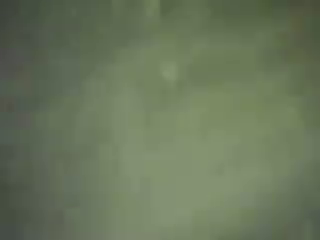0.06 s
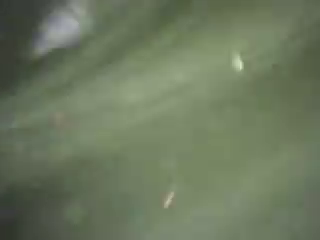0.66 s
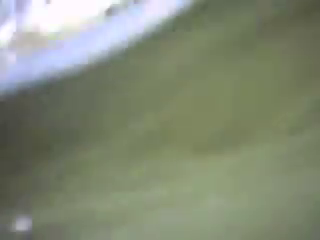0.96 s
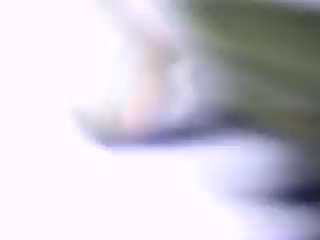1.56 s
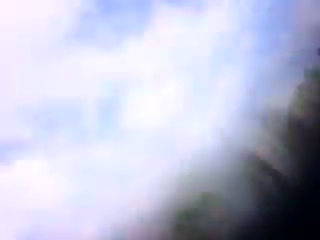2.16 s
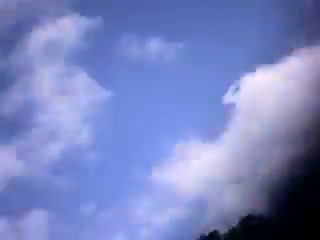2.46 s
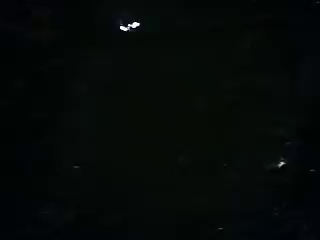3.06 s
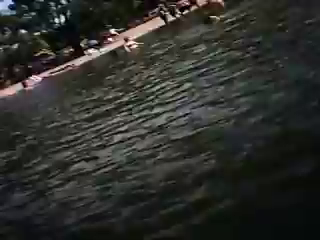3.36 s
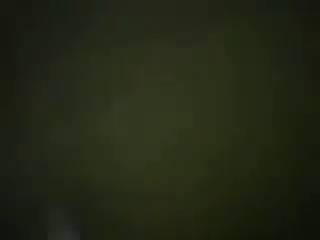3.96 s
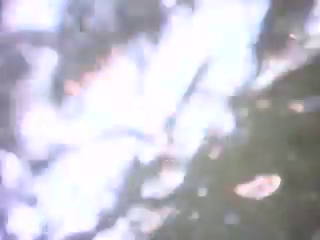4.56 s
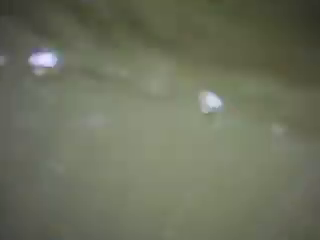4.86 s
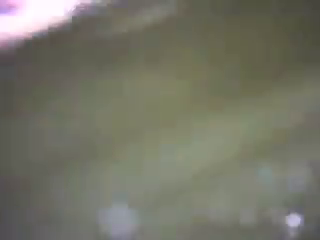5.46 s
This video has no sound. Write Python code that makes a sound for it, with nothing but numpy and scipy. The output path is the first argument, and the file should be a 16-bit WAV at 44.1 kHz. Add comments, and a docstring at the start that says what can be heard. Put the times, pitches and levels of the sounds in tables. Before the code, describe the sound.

Irregular muffled splashes and gurgles hit a small microphone at the water's surface, with knocks, booms and a crackling dunk.

```python
"""Water plops and sloshes around a small waterproof camera that is dipped, swung out and plunged back in.
Drops strike the housing and trap bubbles, which resonate like masses on springs of air; sloshes churn up
swarms of them. Air pockets throb, jolts set the mount booming and the wet housing rubs in its grip,
all over a faint hiss and a low sway. The plunge overloads the narrow-band microphone, which chokes for
moments and crackles."""
import sys
import numpy as np
from scipy import signal
from scipy.fft import rfft, irfft, next_fast_len
from scipy.io import wavfile

SR = 44100
rng = np.random.default_rng(int(sys.argv[2]) if len(sys.argv) > 2 else 0)


def dump_mix(stems):
    """Bounce the given channels to the path in sys.argv[1] as a 16-bit WAV at rate SR."""
    frames = np.atleast_2d(stems).T  # one column per channel
    limited = np.clip(frames, -1, 1)  # hard clip at full scale
    pcm = np.round(limited * 32767).astype(np.int16)
    wavfile.write(sys.argv[1], SR, pcm)


N = 251370


def amp(db):
    """Amplitude ratio of a level in decibels."""
    return 10 ** (np.asarray(db) / 20)


def unit(x):
    """Normalisation to rms 1."""
    return x / np.sqrt(np.mean(x ** 2) + 1e-20)


def clock(seconds):
    """Sample times over a duration."""
    return np.arange(int(seconds * SR)) / SR


def add(track, start, sound):
    """Superposition: a sound joins a track at a start time in seconds."""
    part = track[max(round(start * SR), 0):][:len(sound)]
    part += sound[:len(part)]


def filtered(x, response):
    """Linear filtering: the spectrum of x is multiplied by a frequency response."""
    size = next_fast_len(len(x) + 8192)
    return irfft(rfft(x, size) * response(np.fft.rfftfreq(size, 1 / SR)), size)[:len(x)]


def coloured(x, points):
    """Spectral shaping by (Hz, dB) points, at rms 1."""
    points_hz, db = np.transpose(points)
    return unit(filtered(x, lambda hz: amp(np.interp(np.log(hz + 1), np.log(points_hz), db))))


def ring(t, hz, t60, attack, rise=0):
    """Damped oscillation; rise is the fraction by which a bubble's pitch climbs as it nears the surface."""
    phase = 2 * np.pi * hz * t * (1 + rise * np.minimum(t / t60, 1) / 2)
    return np.sin(phase) * amp(-60 * t / t60) * (1 - np.exp(-t / attack))


def swarm(rate, low_hz, high_hz, cycles, spread_db):
    """Shot noise: ringing grains (bubbles, slips) of random size add up at random moments, at rms 1."""
    pitch, strength, polarity, onset = np.hsplit(rng.random((int(rate * N / SR), 4)), 4)
    hz = low_hz * (high_hz / low_hz) ** pitch
    size = amp(spread_db * np.minimum(-np.log(1 - strength), 3)) * np.sign(polarity - .5)
    t = clock(min(cycles / low_hz, 80 / rate))
    grains = size * ring(t, hz, t60=cycles / hz, attack=0.16 / hz, rise=0.27)
    samples = (onset * N).astype(int) + np.arange(len(t))
    return unit(np.bincount(samples.ravel(), grains.ravel(), N)[:N])


def swell(full_at, rise, hold, t60):
    """Exponential envelope: growth by 60 dB over the rise time, a hold at gain 1, then decay."""
    t = np.arange(N) / SR - full_at
    return amp(-60 * (np.maximum(-t, 0) / rise + np.maximum(t - hold, 0) / t60))


def calm():
    """Background noise: a steady hiss, with a few tiny bubbles in free oscillation."""
    # Spectrum of the hiss. Each row: frequency in Hz, relative spectral density in dB.
    hiss_colour = [(71, -20.5), (120, -5.5), (279, -7), (401, -8.5), (584, -7.5), (639, -10.5),
                   (1050, -11.5), (1240, -10.5), (1810, -14.5), (2560, -15.5), (3780, -20.5), (4400, -16.5),
                   (5720, -66), (9680, -120)]
    specks = swarm(rate=34, low_hz=537, high_hz=3520, cycles=19, spread_db=4)
    hiss = coloured(rng.standard_normal(N), hiss_colour)
    return amp(-45) * (hiss + amp(-9.5) * specks)


def sway(stir):
    """Relaxation: water heaves around the housing, more while it is stirred and for a moment after."""
    # Spectrum of the heaving water. Each row: frequency in Hz, relative spectral density in dB.
    sway_colour = [(20, -5), (50, -5), (88, -4), (130, -12), (300, -28), (1000, -73)]
    rest_db, heave_db, lag_s = -48.5, -10.5, 0.075
    pole = np.exp(-1 / (lag_s * SR))
    heave = signal.lfilter([1 - pole], [1, -pole], stir)
    return (amp(rest_db) + amp(heave_db) * heave) * coloured(rng.standard_normal(N), sway_colour)


def plops():
    """Impact and resonance: each drop ticks, thuds, excites the housing's modes and traps a bubble."""
    # Drops on the housing. Each row: start in seconds, level in dB, bubble pitch in Hz,
    # relative tick level in dB, relative housing level in dB.
    drops = [(0.059, -25, 580, -35, -2), (0.135, -9, 2410, -30, -2), (0.561, -21, 492, -2, 0),
             (0.806, -14, 1540, -16, -3), (0.847, -18, 840, -12, -3), (0.859, -6.5, 3110, -22, -3),
             (0.872, -15, 1450, -6, 4), (0.884, -16, 3220, -8, -12), (0.934, 0, 593, -8, -6.5),
             (1.259, -29.5, 1780, -4.5, -4), (1.381, -31, 950, -6, 2), (1.414, -22.5, 550, -28, -9),
             (1.471, -4, 410, -22, -5), (1.518, -2, 522, -9.5, -15), (1.53, -7.5, 553, -1, -2.5),
             (1.603, 2, 2133, -30, -12), (1.633, -3.5, 2890, -26, -7), (1.664, -10.5, 2230, -17, -8),
             (1.697, -6.5, 2610, -6, -9), (1.707, -3.5, 1360, -1.5, -9.5), (1.747, 5.5, 1788, -4.5, 1),
             (1.759, 10.5, 1663, -17, -6), (1.776, 2, 1910, -6.5, -7.5), (1.847, -5.5, 1693, -17, -3.5),
             (1.86, -1.5, 1622, -27, -0.5), (1.909, -1.5, 1030, -2, -9), (1.971, -18, 2050, -5, 0),
             (2.024, -15.5, 1006, -8, -10), (2.059, -23, 935, -2, -16), (2.873, -33, 1690, 3, 0),
             (3.003, -2.5, 494, -9, -2.5), (3.026, -4, 567, -22, 9), (3.157, -24, 2990, -4, -13),
             (3.816, 6.5, 1130, -13.5, 1.5), (3.835, -5, 1300, -7.5, 3), (4.213, 0, 1390, -10, -2),
             (4.339, 2, 937, -1.5, -6), (4.484, 8, 1003, -10, -11), (4.517, 1, 535, -25, -7),
             (4.545, -2, 1360, -12, -10), (4.565, 1, 456, -13, 2), (4.67, -0.5, 1738, -8, -6),
             (4.838, -18, 1420, -30, -8.5), (4.884, -22.5, 1470, -29, -7), (4.936, -2, 514, -28, -5),
             (5.002, -16.5, 1485, -7, -5), (5.129, 4, 1400, -5, -7), (5.644, -3, 534, -18, -7)]
    # Modes of the housing. Each row: frequency in Hz, relative level in dB, t60 in seconds.
    housing_modes = [(245, -15, 0.086), (570, -7.5, 0.044), (929, -1.5, 0.008), (1091, -5.5, 0.017),
                     (1319, 1.5, 0.013), (1603, -4, 0.019), (2310, -15, 0.028), (2766, -9, 0.011),
                     (2930, -1, 0.0077)]
    out, t = np.zeros(N), clock(0.092)
    tick_band = signal.butter(2, [2100, 4400], "band", fs=SR, output="sos")
    for start, db, hz, tick_db, housing_db in drops:
        khz = hz / 1000
        # smaller bubbles sing higher and die sooner
        bubble = amp(-1.5) * ring(t, hz, t60=0.032 * khz ** -0.2, attack=0.00095, rise=0.096)
        modes = np.zeros(len(t))
        for mode_hz, mode_db, t60 in housing_modes:
            # the housing answers most strongly near the bubble's own pitch
            octaves_apart = abs(np.log2(mode_hz / hz))
            gain = amp(mode_db + rng.normal(0, 3) - 4.3 * octaves_apart)
            modes += gain * ring(t, mode_hz, t60, attack=0.00014)
        # a wet contact is a main touch followed by a few milliseconds of smaller ones
        contact = amp(-21.5) * rng.standard_normal(len(t)) * amp(-60 * t / 0.033)
        contact[0] = 1
        housing = signal.fftconvolve(contact, modes)[:len(t)]
        housing /= np.abs(housing).max()
        splat = unit(signal.sosfilt(tick_band, rng.standard_normal(len(t))))
        tick = splat * amp(-60 * t / 0.015) * (1 - np.exp(-t / 0.0004))
        thud_db = -18.5 - 2 * np.log2(khz)  # smaller drops thud less
        thud = amp(thud_db) * ring(t, rng.uniform(260, 400), t60=0.028, attack=0.00087)
        plop = bubble + amp(housing_db + 5) * housing + amp(tick_db + 3) * tick + thud
        add(out, start, amp(db) * plop)
        # the drop's leading edge wets the housing just before the blow
        add(out, start - rng.uniform(0.003, 0.0035), amp(db - 22) * housing)
    return out


def churn():
    """Incoherent addition: sloshes sum in power to give the envelopes of gulps, bubbles and spray."""
    # Sloshes, dips and the long plunge. Each row: time of full strength, rise, hold and t60, all in
    # seconds, bubble level in dB, then gulp and spray levels in dB relative to the bubbles.
    slosh_events = [(0.773, .01, 0.034, .09, -27, -13, -11), (1.471, .02, .06, 0.06, -19.5, 5, -13),
                    (1.73, .45, .26, .33, -30.5, 3.5, -8.5), (1.749, .11, 0.026, .14, -14, -4, -2),
                    (1.862, 0.1, .003, .06, -17, 2, 1), (2.235, .04, 0.011, 0.29, -34, -11, -10),
                    (2.423, .05, .03, 0.091, -53.5, -12, 9.5), (2.938, .03, 0.078, .05, -30.5, -5, -2.5),
                    (3.015, .025, .06, .03, -9.5, -3, -13), (3.768, .005, .02, .06, -4.5, -6.5, -8),
                    (3.885, .008, 0.473, .14, -9.3, 3.5, -10.3), (4.389, .02, 0.013, .07, -11, -10, -6),
                    (4.436, .01, .004, .33, -13, -13, -8), (4.518, .012, .005, .12, -5.5, -17, -11),
                    (4.592, .018, 0.0025, .14, -14, -7, -17)]
    # gulps fade and spray grows as the air breaks into smaller bubbles
    breakup_db_per_s, fizz_db_per_s = 42, 14
    t, power = np.arange(N) / SR, np.zeros((3, N))
    for full_at, rise, hold, t60, db, gulp_db, spray_db in slosh_events:
        age = np.maximum(t - full_at, 0)
        bubble = amp(db) * swell(full_at, rise, hold, t60)
        gulp = bubble * amp(gulp_db - breakup_db_per_s * age)
        spray = bubble * amp(spray_db + fizz_db_per_s * np.minimum(age, hold))
        power += np.square([gulp, bubble, spray])
    return np.sqrt(power)


def sloshes(gulp_gain, bubble_gain, spray_gain):
    """Bubble resonance rises as size falls: low gulps, mid-sized bubbles in a wash, and fine spray."""
    # Churning water heard through the housing. Each row: frequency in Hz, relative gain in dB.
    transmission = [(300, 0), (430, 1), (540, 3.5), (700, 2), (900, 2), (1400, 7.5), (1750, 5.5),
                    (2200, -6.5), (3200, -27), (4200, -23)]
    gulps = swarm(rate=260, low_hz=185, high_hz=560, cycles=8.8, spread_db=2)
    wash = amp(-6.5) * rng.standard_normal(N)
    bubbles = swarm(rate=800, low_hz=490, high_hz=2009, cycles=22.5, spread_db=3)
    froth = coloured(bubbles + wash, transmission)
    spray = swarm(rate=1100, low_hz=1864, high_hz=3910, cycles=16, spread_db=6)
    water = amp(-1.5) * gulp_gain * gulps + amp(-2.5) * bubble_gain * froth + amp(-1) * spray_gain * spray
    # the hardest churn presses far beyond what the microphone can follow
    return water * (1 + 1.31 * bubble_gain)


def air_pockets():
    """Volume pulsation: air dragged under by the camera rings freely; larger pockets glide up less."""
    # Trapped pockets. Each row: start in seconds, level in dB, pitch in Hz, t60 in seconds.
    pockets = [(0.774, -13, 840, .04), (0.783, -14.5, 1505, .055), (1.469, 3, 150.6, 0.1),
               (1.65, -17, 317, .06), (1.757, -3.5, 327, 0.078), (1.791, -6, 1260, .05),
               (1.81, -12.5, 385, 0.098), (1.87, -7, 350, .085), (1.893, -5.5, 987, 0.037),
               (1.937, -11, 384, .075), (1.979, -19, 2000, .04), (1.985, -11, 311, 0.062),
               (3.888, 6, 278.4, 0.32), (3.931, 0, 160, .16), (3.978, 4, 500, .07), (3.988, -2, 150, .092),
               (4.032, 4, 385, 0.13), (4.055, 3, 282, .2), (4.131, -1, 276.2, 0.16), (4.328, 6, 820, .08),
               (4.386, -3, 2400, .025), (4.459, 0, 921, 0.038), (4.524, 6, 535, .045),
               (4.662, -11.5, 1410, 0.078), (5.643, -1.5, 216, 0.028)]
    out, t = np.zeros(N), clock(.8)
    attack_cycles = 1.4
    for start, db, hz, t60 in pockets:
        throb = ring(t, hz, t60, attack=attack_cycles / hz, rise=0.16 * np.sqrt(hz / 1000))
        add(out, start, amp(db) * throb)
    return out


def mount_booms():
    """Free vibration: each jolt sets the mount swinging in a low, damped mode."""
    # Jolts to the mount. Each row: start in seconds, level in dB, pitch in Hz, t60 in seconds.
    jolts = [(0.859, -17, 78.4, 0.33), (0.938, -16.5, 78.7, 0.35), (1.467, -1, 82.6, 0.26),
             (2.099, -8, 81.5, 0.06), (2.275, -16.5, 98, 0.11), (2.972, -11, 47.5, 0.21),
             (3.035, 10, 86.8, 0.33), (3.445, -24, 90.7, 0.99), (4.512, 2, 98.5, 0.062),
             (5.645, -5, 114.5, 0.061)]
    out, t = np.zeros(N), clock(.8)
    for start, db, hz, t60 in jolts:
        add(out, start, amp(db) * ring(t, hz, t60, attack=0.004))
    return out


def surges():
    """Hydrodynamic pressure: hard moves of the camera load the microphone port with half-sine swings."""
    # Swings that choke the microphone. Each row: start and end in seconds, peak pressure in full scales.
    swings = [(3.009, 3.021, 6), (3.784, 3.796, 14), (3.798, 3.820, -18), (3.824, 3.836, -10),
              (3.838, 3.886, 45)]
    out = np.zeros(N)
    for start, end, pressure in swings:
        add(out, start, pressure * np.sin(np.pi * clock(end - start) / (end - start)))
    return out


def rub():
    """Stick-slip friction: the wet housing groans as it moves in its grip by small irregular slips."""
    # Rubbing strokes. Each row: time of full strength, rise, hold and t60, all in seconds, level in dB.
    strokes = [(3.3, 0.76, .02, 0.87, -41), (3.544, 0.041, .003, 0.059, -25),
               (3.603, 0.088, 0.12, 0.067, -31)]
    # Colour that the housing gives the slips. Each row: frequency in Hz, relative gain in dB.
    rub_colour = [(120, -58), (200, -27), (210, -35), (254, -11), (302, -17), (441, 1.5), (746, -15.5),
                  (946, -17), (1230, -10), (1980, -15.5), (2480, -34), (3000, -33), (4000, -48),
                  (5200, -80), (8800, -120)]
    slips = swarm(rate=870, low_hz=366, high_hz=2170, cycles=1, spread_db=0.5)
    envelope = sum(amp(db) * swell(full_at, rise, hold, t60) for full_at, rise, hold, t60, db in strokes)
    return envelope * coloured(slips, rub_colour)


def scene():
    """Superposition: the pressures of all sources add at the single microphone."""
    gulp_gain, bubble_gain, spray_gain = churn()
    water = plops() + sloshes(gulp_gain, bubble_gain, spray_gain) + sway(gulp_gain + bubble_gain)
    return (water + air_pockets() + mount_booms() + surges() + rub() + calm())[None]


def clip(x, top, order):
    """Saturation: the wave flattens toward the top, more abruptly at a higher order."""
    return x / (1 + np.abs(x / top) ** order) ** (1 / order)


def record(dry):
    """Overload: the capsule saturates, its coupling drains held pressure, the narrow-band output clips."""
    drain_hz, voice_band_hz, top_hz = 90, 3800, 16300
    capsule = clip(dry[0], top=0.65, order=6)
    coupled = filtered(capsule, lambda hz: 1j * hz / (drain_hz + 1j * hz))
    narrow = filtered(coupled, lambda hz: 1 / np.sqrt(1 + (hz / voice_band_hz) ** 44))
    clipped = clip(narrow, top=.71, order=24)
    return filtered(clipped, lambda hz: hz < top_hz)[None]


dry = scene()
out = record(dry)
dump_mix(out)
```